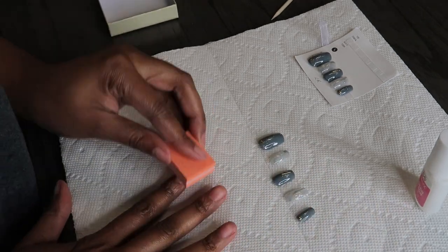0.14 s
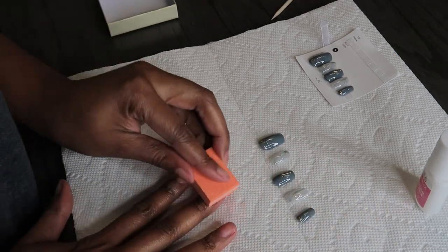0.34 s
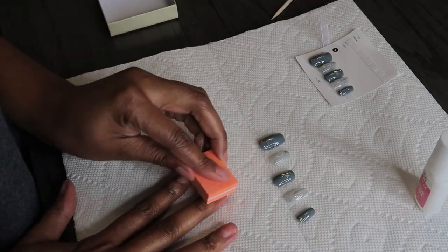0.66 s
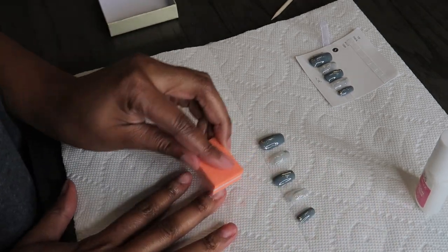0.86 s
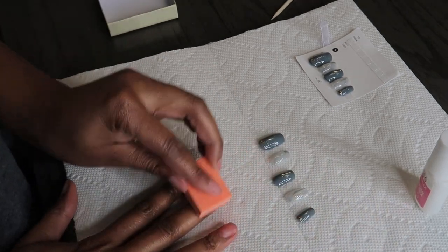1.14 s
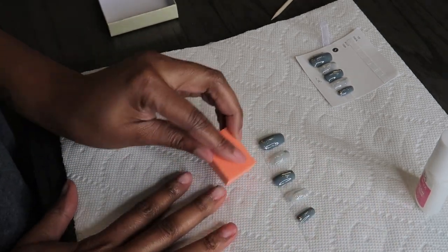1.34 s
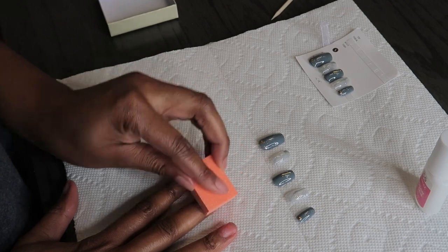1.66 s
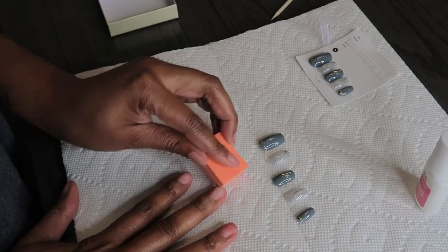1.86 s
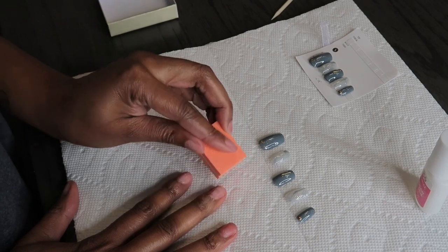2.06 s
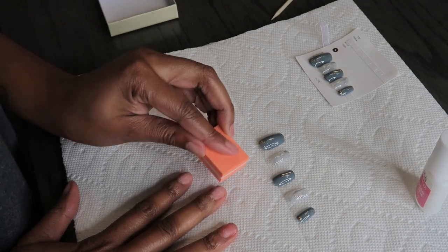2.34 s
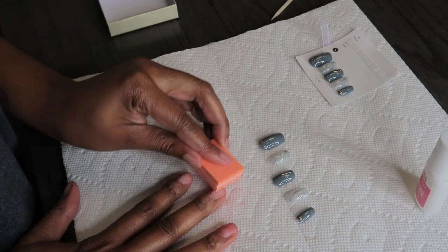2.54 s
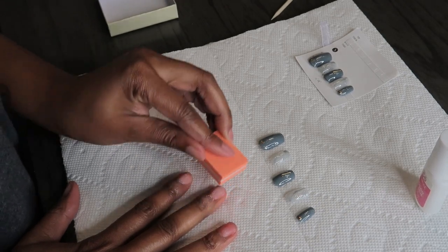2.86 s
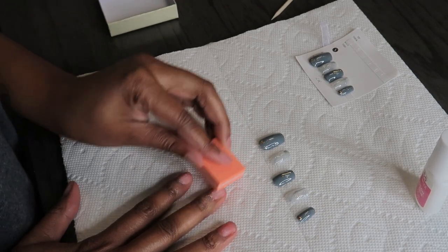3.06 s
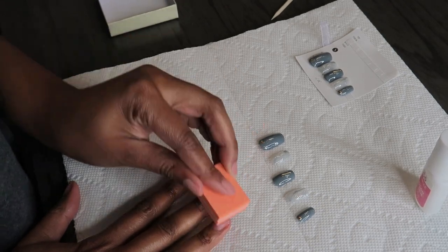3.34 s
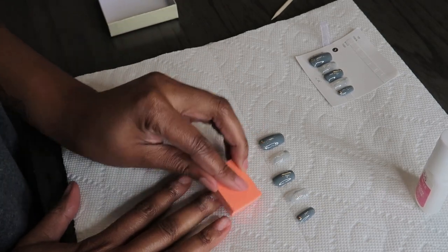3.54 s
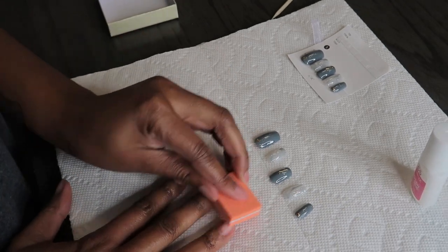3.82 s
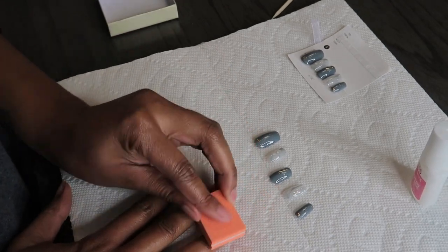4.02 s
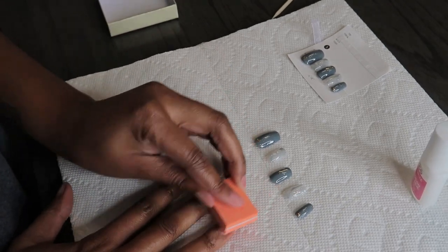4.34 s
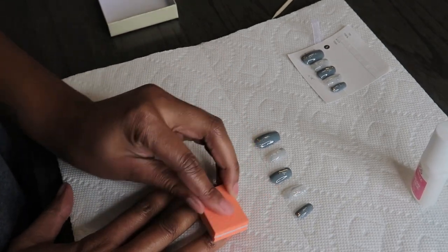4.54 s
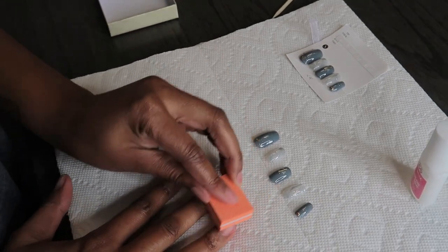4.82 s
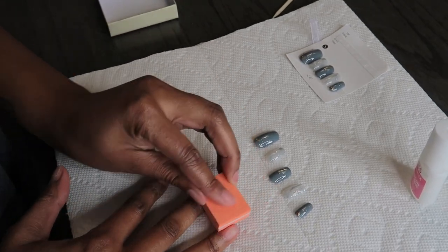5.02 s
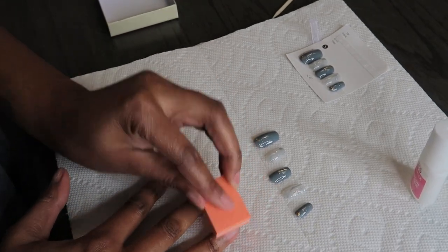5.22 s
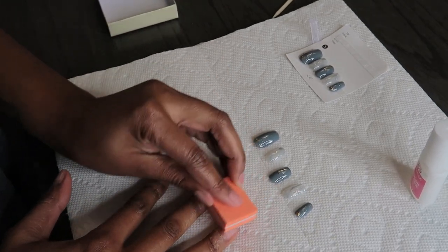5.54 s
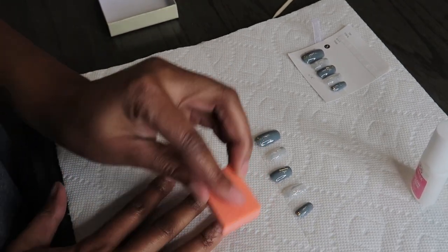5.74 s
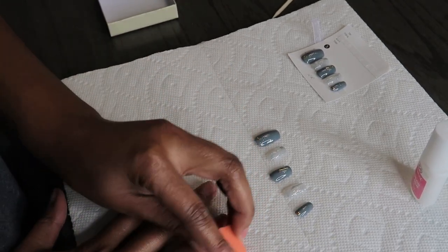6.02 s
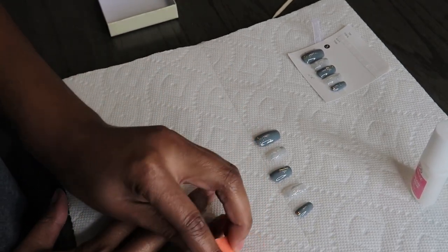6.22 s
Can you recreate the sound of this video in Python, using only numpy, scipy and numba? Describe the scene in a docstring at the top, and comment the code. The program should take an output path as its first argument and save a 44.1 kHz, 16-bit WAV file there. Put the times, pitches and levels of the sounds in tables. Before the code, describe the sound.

Close to a camera microphone at a table in a small room, a sanding block rubs fingernails in short, bright, gritty scratches, usually in quick runs of about four a second. Light taps and tiny crunches mark its landings, with occasional sharper scratches. A low, wavering ventilation hum continues throughout, with faint motor ticks during the first second.

```python
"""At a table in a small ventilated room, a foam sanding block buffs fingernails close to a camera.
Strokes, about four a second, are enveloped grit noise, crackling with snags, through nail resonances.
Landings add a snap and a crunch; coarse grains add short scratches. Room noise tails answer.
Ventilation is coloured noise plus tones; for about the first second a lens motor ticks as it refocuses."""
import sys
import numpy as np
from scipy import signal
from scipy.fft import rfft, irfft, next_fast_len
from scipy.io import wavfile
from scipy.ndimage import map_coordinates
from numba import njit

SR = 44100
rng = np.random.default_rng(int(sys.argv[2]) if len(sys.argv) > 2 else 0)


def put_to_file(sound):
    """Save the sound as 16-bit audio at rate SR, in the file named by the first command-line argument."""
    columns = np.atleast_2d(sound).T  # one column per channel
    safe = np.clip(columns, -1, 1)
    whole_steps = np.round(safe * 32767)
    wavfile.write(sys.argv[1], SR, whole_steps.astype(np.int16))


N = 281534
TIME_S = np.arange(N) / SR
FFT_SIZE = next_fast_len(N + SR)
FREQ_HZ = np.arange(FFT_SIZE // 2 + 1) * SR / FFT_SIZE

# ventilation noise density: (frequency [Hz], level [dB per Hz])
AIR_SPECTRUM = [(15, -78), (28, -76), (60, -68), (150, -69), (200, -69), (300, -77), (420, -79),
                (620, -80.5), (1000, -87), (2000, -93.5), (4000, -101), (8000, -108.5), (12000, -111),
                (15000, -120)]
# duct and room modes: (centre [Hz], width at half power [Hz], peak density [dB per Hz])
DUCT_MODES = [(35, 8.1, -64.5), (74.9, 11.1, -55), (85.9, 4, -55), (107, 10.9, -48), (122.7, 5.3, -49.5),
              (131.85, 9.6, -50), (150, 34, -64.5), (177.6, 5.1, -63), (231, 27.8, -65), (268, 10.2, -66.5),
              (309.3, 25.5, -65), (342, 6.6, -72), (386.7, 35.5, -71.5), (449.4, 22, -76.5)]
# mains, motor and electronics tones: (frequency [Hz], mean RMS level [dB])
HUM_TONES = [(120, -46), (218, -60), (259.3, -56.5), (778, -71.5), (908, -71.5), (11449, -87)]
# likeness of the ventilation noise at the two ports: (frequency [Hz], correlation [0-1])
PORT_LIKENESS = [(80, .9998), (130, 1), (230, 0.97), (420, 0.74), (900, 0.65), (1300, 0.18), (4000, 0.5),
                 (12000, 0)]
# strength of the air flow: (time [s], gain [dB])
AIR_FLOW = [(0, 0.5), (.9, 0.5), (1.8, -0.5), (3.1, 0.5), (4.1, -1), (5.2, -1), (6.3, -2)]
# lens motor steps: (time [s], relative level [dB])
FOCUS_STEPS = [(.184, -40.5), (.199, -48), (.215, -44.5), (.232, -49), (.248, -51), (.266, -53),
               (.282, -53), (.298, -48), (.315, -45.5), (.341, -47), (.365, -48), (.382, -53), (.399, -53),
               (.417, -53), (.433, -49), (.474, -48), (.498, -46), (.616, -45), (.634, -44), (.648, -46.5),
               (.682, -46), (.699, -50), (.965, -50), (.982, -50), (.999, -53), (1.011, -51), (1.024, -45)]
# lens barrel resonances: (centre [Hz], width [Hz], relative gain [dB])
BARREL_MODES = [(3270, 300, -4), (3930, 350, -9), (4440, 320, -1), (5100, 300, -6)]
# lead of the left microphone port over the right: (frequency [Hz], phase [rad])
PORT_LEAD = [(100, 0), (4300, 0), (5200, .8), (6100, 1.7), (7200, 2), (8200, 2.7), (9200, 1.7),
             (10800, 2.7), (12500, 2.9), (15000, 2.6)]
# room sound against direct sound: (frequency [Hz], ratio [dB])
WET_RATIO = [(500, -14), (1500, -9), (3200, -8.5), (4500, -1.5), (6400, -4), (7700, -4.5), (8700, -1.5),
             (10500, -21), (13000, -50)]
# colour of grit on nail: (frequency [Hz], relative gain [dB])
SCRAPE_COLOUR = [(300, -20), (600, -4.5), (900, -7), (1400, -4.5), (2400, -3.5), (4200, -6.5), (5500, -2),
                 (6400, -3.5), (7300, -5), (8400, -6.5), (9800, -9), (11400, -7.5), (13000, -13),
                 (15000, -25)]
# block, hand and table top resonances: (centre [Hz], width at half the dB [Hz], relative gain [dB])
BODY_MODES = [(1350, 74, 8), (1620, 190, 3.5), (1823, 46, 9), (2016, 330, -3.5), (2080, 50, 8.5),
              (2288, 120, -9.5), (2310, 32, 15), (2458, 30, 8), (2600, 23, 6), (3510, 78, 4.5),
              (3900, 240, 3.5), (4600, 370, 1), (5150, 520, 3), (5430, 300, -3), (6320, 1230, 4),
              (8600, 600, 0.5), (9550, 1400, 2.5)]
# block landings: (time [s], relative level [dB], relative snap against crunch [dB], crunch decay [s],
#                  contact ring [Hz], dull knock [dB])
LANDINGS = [(.499, -52.5, -4, 0.014, 6300, 8), (1.266, -51, -6, .004, 6300, 9),
            (1.525, -53, -4, .0036, 6300, 6), (2.298, -53, -4, .004, 6300, 7),
            (2.552, -55, -4, .003, 6300, 4), (2.836, -53, 0, .004, 6300, -2),
            (3.087, -49, -7, .002, 3500, 11), (3.523, -44.5, -8, 0.0095, 6300, 2.5),
            (3.8318, -48, -1, .002, 6300, 7), (4.134, -44.5, -6, 0.0015, 3480, 7),
            (4.383, -55, -3, .003, 6300, 3), (4.627, -44.5, -2, .0043, 6300, 3),
            (4.88, -40, -0.5, .001, 1200, 7), (4.888, -52, 5, .0014, 6300, 4),
            (5.094, -44.5, -7, 0.0084, 6300, 7), (5.1474, -51, 14.5, .00093, 3400, -2),
            (5.3581, -41.5, 1, .0018, 1300, 7), (5.604, -50.5, -3, 0.0064, 1500, 9.5),
            (6.072, -54, 5, .0027, 3500, 9), (6.3228, -50, 3, .0026, 3500, 6)]
# coarse grains catching on the nail's edge: (time [s], relative level [dB], decay [s])
GRAIN_SCRATCHES = [(0.847, -43, 0.0037), (1.5638, -44, .004), (1.891, -40, 0.013), (3.603, -38, .003),
                   (3.877, -44, .006), (3.961, -35, .0012), (4.659, -46, .003), (4.907, -45, 0.0059),
                   (4.93, -46, .004), (5.645, -50, .004), (6.143, -35.5, .005)]
# block strokes: (start [s], length [s], relative level [dB], skew [under 1 peaks early],
#                 mean dull rasp against hiss [dB], mean contact ring [Hz], mean nail bending pitch [Hz],
#                 bending strength [dB], finest sizzle gain [dB])
STROKE_TABLE = [(0.154, 0.078, -54.5, .75, -8, 8500, 2100, -6, 2),
                (0.523, 0.075, -38, 0.87, -1.5, 6860, 2000, -6, -3),
                (.716, 0.038, -45.5, 0.92, 1, 6700, 2100, -12, 0),
                (0.774, 0.13, -39, .92, -.5, 6800, 2330, -4, -10),
                (1.044, 0.096, -39, 0.79, -5, 7300, 2260, 0, -10),
                (1.182, 0.027, -58, .91, 5, 6300, 2100, -3, 5),
                (1.295, 0.12, -41, 0.78, -2, 6740, 2700, -2, 1),
                (1.558, 0.11, -41, 0.83, -4, 6900, 2500, -8, 0),
                (1.812, 0.13, -37.5, 0.68, -4, 7050, 3870, -10, -4),
                (2.331, 0.076, -40.5, .76, -4, 6860, 2180, -3, -7),
                (2.587, .105, -41.5, 0.76, -5.5, 6600, 1890, 3, -5),
                (2.865, 0.082, -43, 0.9, -1.5, 6400, 1900, -3, -6),
                (3.12, 0.072, -41, 0.87, -0.5, 6900, 1700, -11, -2),
                (3.58, 0.099, -38.5, 0.92, -2, 7350, 2040, -4, -1),
                (3.872, 0.11, -39, 1.25, 1, 6700, 1640, -6, -3),
                (4.168, 0.1, -40.5, 0.78, 1, 6240, 1690, -20, -7),
                (4.414, 0.098, -40, .72, 0.5, 6300, 2000, -14, -8),
                (4.665, 0.078, -41, 0.45, -1, 5770, 2190, -19, -7),
                (4.912, 0.076, -39.5, 0.5, 0, 6200, 4200, -5, -2),
                (5.165, 0.038, -43.5, 0.54, 0, 6200, 4200, 4, 4),
                (5.397, 0.067, -41, 0.54, -3, 6040, 1300, -19, -9),
                (5.638, 0.061, -41.5, 0.78, -1, 5930, 2400, -13, -1),
                (5.809, 0.028, -63, .7, 9, 6300, 2400, -9, 0),
                (6.109, 0.099, -40.5, 0.86, 2.5, 6540, 1870, -8, -5),
                (6.355, 0.056, -38.5, 1.1, 3, 7200, 3260, 1.5, 8)]


def undb(db):
    """Decibels to gain."""
    return 10 ** (np.asarray(db) / 20)


def curve(points):
    """Join (Hz, value) points on a log-frequency axis."""
    hz, value = np.transpose(points)
    return np.interp(np.log(FREQ_HZ + 1), np.log(hz), value)


def bell(centre_hz, width_hz):
    """Resonance shape: 1 at the centre, 0.5 at the edges of its width."""
    return .5 ** ((2 * (FREQ_HZ - centre_hz) / width_hz) ** 2)


def colour(x, gain):
    """Filter by a gain for each frequency."""
    return irfft(rfft(x, FFT_SIZE) * gain, FFT_SIZE)[..., :N]


def causal(db):
    """Unit-power minimum-phase response: it rings only after its cause."""
    cepstrum = irfft(np.log(undb(db)), FFT_SIZE)
    response = np.exp(rfft(2 * cepstrum[:FFT_SIZE // 2], FFT_SIZE))
    return response / np.sqrt(np.mean(abs(response) ** 2))


def walk(rate_hz):
    """Smooth random drift of unit spread."""
    drift = colour(rng.standard_normal(N), bell(0, 2 * rate_hz))
    return drift / drift.std()


def add(track, start_s, sound):
    """Mix a short sound into a track at its time."""
    first = int(start_s * SR)
    part = track[first:first + len(sound)]
    part += sound[:len(part)]


def above(x, hz):
    """The part of a sound above a frequency."""
    return signal.sosfiltfilt(signal.butter(3, hz, "high", fs=SR, output="sos"), x)


@njit
def resonator(x, hz, width_hz):
    """State-variable band-pass, unity at a centre that may move at every sample."""
    y, band, low = np.empty(len(x)), 0., 0.
    for i in range(len(x)):
        g, damping = np.tan(np.pi * hz[i] / SR), width_hz / hz[i]
        v = (band + g * (x[i] - low)) / (1 + g * (g + damping))
        band, low = 2 * v - band, low + 2 * g * v
        y[i] = damping * v
    return y


def ventilation(waver_db=2.5, waver_hz=2.0, flutter_db=1.7, flutter_hz=12):
    """Air rumbles in duct and room modes, alike at both ports in the bass, with wavering tones."""
    power = undb(curve(AIR_SPECTRUM)) ** 2
    for hz, width_hz, db in DUCT_MODES:
        power = power + undb(db) ** 2 * bell(hz, width_hz)
    alike = np.clip(curve(PORT_LIKENESS), -1, 1)
    density_gain = power * SR / 2
    mid = colour(rng.standard_normal(N), np.sqrt(density_gain * (1 + alike) / 2))
    side = colour(rng.standard_normal(N), np.sqrt(density_gain * (1 - alike) / 2))
    # flow strength scales only the low rumble
    flow_gain = undb(np.interp(TIME_S, *np.transpose(AIR_FLOW)))
    mid = mid + colour(mid, bell(0, 540)) * (flow_gain - 1)
    # eddies make the rush of air waver
    mid = mid + colour(mid, bell(1110, 1330)) * (undb(flutter_db * walk(flutter_hz)) - 1)
    tones = np.zeros(N)
    for hz, db in HUM_TONES:
        amplitude = np.sqrt(2) * undb(db + waver_db * walk(waver_hz))
        tones += amplitude * np.sin(2 * np.pi * (hz * TIME_S + rng.random()))
    return mid + side * np.array([[1], [-1]]) + tones


def lens_motor(tick_decay_s=0.0032, gain_db=-2.5):
    """The focus motor hunts in small uneven steps; each noise tick rings the barrel briefly."""
    force = np.zeros(N)
    tick = np.exp(-TIME_S[:SR // 50] / tick_decay_s)
    for start_s, db in FOCUS_STEPS:
        add(force, start_s, undb(db + gain_db) * tick)
    modes = sum(undb(db) / (1 + 2j * (FREQ_HZ - hz) / width_hz) for hz, width_hz, db in BARREL_MODES)
    barrel = bell(4100, 3200) * modes
    barrel = barrel / np.sqrt(np.mean(abs(barrel) ** 2))
    return colour(force * rng.standard_normal((2, N)), barrel)


def room(x, t60_s=0.62, treble_t60_s=0.28, early_s=0.0074, early_db=5):
    """Direct sound reaches the ports out of step; table and walls add a short diffuse tail."""
    age_s = TIME_S[:SR // 2]
    noise = rng.standard_normal((2, len(age_s)))
    dull = signal.sosfilt(signal.butter(2, 4000, fs=SR, output="sos"), noise)
    tail = dull * 1e-3 ** (age_s / t60_s) + (noise - dull) * 1e-3 ** (age_s / treble_t60_s)
    # denser early reflections, none within the first millisecond
    tail = tail * (1 + undb(early_db) * np.exp(-age_s / early_s)) * (age_s > .001)
    tail = tail / np.sqrt(np.sum(tail ** 2, axis=1, keepdims=True))
    wet = undb(curve(WET_RATIO))
    direct = np.exp(.5j * np.array([[1], [-1]]) * curve(PORT_LEAD))
    response = (direct + wet * rfft(tail, FFT_SIZE)) / np.sqrt(1 + wet ** 2)
    return colour(x, response)


def grit(size, spread_db):
    """Dense tiny catches of abrasive grains, a few of them much larger."""
    largeness = np.minimum(rng.exponential(size=size), 5)
    catches = rng.standard_normal(size) * undb(spread_db * largeness)
    return catches / catches.std()


def contact(push, ring_hz, rasp_db, ring_width_hz=1300, ring_db=-4, rasp_hz=3300):
    """The nail rings at a pitch set by where it is pressed; a flatter, firmer contact adds low rasp."""
    ring = resonator(push, ring_hz * np.ones(len(push)), float(ring_width_hz))
    low = signal.sosfiltfilt(signal.butter(3, rasp_hz, fs=SR, output="sos"), push)
    return push + undb(ring_db) * ring + (undb(rasp_db) - 1) * low


def flex(push, bend_hz, db, width_hz=600):
    """The nail under the block bends at a low pitch of its own, set by where it is pressed."""
    return push + undb(db) * resonator(push, bend_hz * np.ones(len(push)), float(width_hz))


def touches(snap_db=9, settle_db=-18, settle_s=.06, snap_rasp_db=2, gain_db=-4):
    """The block's edge snaps against the nail, the grit crunches and then settles faintly."""
    track, age_s = np.zeros(N), TIME_S[:SR // 5]
    blow = signal.unit_impulse(len(age_s), len(age_s) // 400)  # 0.5 ms in
    for start_s, db, hard_db, crunch_s, ring_hz, knock_db in LANDINGS:
        press = np.exp(-age_s / crunch_s) + undb(settle_db) * np.exp(-age_s / settle_s)
        snap = contact(blow, ring_hz, knock_db + snap_rasp_db, ring_db=12) * undb(snap_db + hard_db)
        crunch = contact(grit(len(age_s), 0.8) * press, ring_hz, knock_db, ring_db=-17)
        add(track, start_s - .0005, undb(db + gain_db) * (snap + crunch))
    return track


def scratches(ring_hz=4000, rasp_db=7, spread_db=3, gain_db=-5):
    """A coarse grain digs in and tears free: a burst of ragged catches, duller than the hiss."""
    track, age_s = np.zeros(N), TIME_S[:SR // 20]
    for start_s, db, decay_s in GRAIN_SCRATCHES:
        burst = grit(len(age_s), spread_db) * np.exp(-age_s / decay_s)
        add(track, start_s, undb(db + gain_db) * contact(burst, ring_hz, rasp_db, ring_db=-2))
    return track


def strokes(judder_db=0.2, judder_hz=150, fullness=.86, spread_db=2.0, rasp_fall_db=6.5,
            hiss_rise_db=8, hiss_start_db=-2, hiss_hz=8000, sizzle_hz=11000, hand_db=-15, gain_db=-2.5,
            ring_wander=0.026, rasp_wander_db=0.5, rock_hz=45, snags_per_s=160, snag_db=11,
            grab_s=0.0013, bite_db=-17, bite_s=.014, bend_glide=0.085, hand_glide=0.19,
            brush_db=-27, brush_s=0.038, brush_wander_db=4):
    """Each stroke bites with a dull rasp, speeds up and slows down; the block judders and rocks."""
    track, age_s = np.zeros(N), TIME_S[:SR // 5]
    size = len(age_s)
    roll, tilt = walk(rock_hz), walk(rock_hz)
    for start_s, length_s, db, skew, rasp_db, ring_hz, bend_hz, bend_db, sizzle_db in STROKE_TABLE:
        travel = np.clip(age_s / length_s, 0, 1)
        speed = abs(np.sin(np.pi * travel ** skew))
        roll_now = np.interp(start_s + age_s, TIME_S, roll)
        tilt_now = np.interp(start_s + age_s, TIME_S, tilt)
        # coarse grains snag and crackle out of the fine grit
        snagged = rng.random(size) < snags_per_s / SR
        snags = snagged * rng.choice([-1, 1], size) * undb(snag_db)
        # the foam gives for a moment, then the grit grabs all at once
        grab = 1 - np.exp(-(age_s / grab_s) ** 4)
        bite = undb(bite_db) * np.exp(-age_s / bite_s)
        # after the push the block still brushes the nail, loosely and unevenly
        brush_decay = np.exp(-np.maximum(age_s - length_s, 0) / brush_s)
        brush = travel * brush_decay * undb(brush_db + brush_wander_db * tilt_now)
        push = (grit(size, spread_db) + snags) * grab * (speed ** fullness + bite + brush)
        # as the block lifts away only the finest grit still touches: the hiss brightens
        push = push + (undb(hiss_start_db + hiss_rise_db * travel) - 1) * above(push, hiss_hz)
        push = push + (undb(sizzle_db) - 1) * above(push, sizzle_hz)
        # the point of pressure slides along the nail, so its bending pitch glides
        push = flex(push, bend_hz * np.exp(bend_glide * (.5 - travel)), bend_db)
        # rocking over the curved nail shifts the ring and makes the rasp come and go
        ring_now_hz = ring_hz * np.exp(ring_wander * roll_now)
        rasp_now_db = rasp_db + rasp_fall_db * (.5 - travel) + rasp_wander_db * tilt_now
        scrape = undb(db) * contact(push, ring_now_hz, rasp_now_db)
        # the moving hand reflects the scrape from a changing distance, shifting its colour
        lag_s = rng.uniform(0.000492, 0.00143) * np.exp(hand_glide * travel)
        reflection = map_coordinates(scrape, [(age_s - lag_s) * SR])
        add(track, start_s, scrape + undb(hand_db) * reflection)
    return track * undb(gain_db + judder_db * walk(judder_hz))


def scene(left_db=0.28):
    """Buffing a little left of centre, the lens motor and the ventilation."""
    modes_db = sum(db * bell(hz, width_hz) for hz, width_hz, db in BODY_MODES)
    body = causal(curve(SCRAPE_COLOUR) + modes_db)
    buffing = room(colour(strokes() + touches() + scratches(), body))
    buffing = buffing * undb(np.array([[left_db], [-left_db]]))
    return buffing + lens_motor() + ventilation()


def record(dry, top_hz=15300):
    """The camera cuts the top with a steep elliptic low-pass."""
    return signal.sosfilt(signal.ellip(8, .2, 70, top_hz, fs=SR, output="sos"), dry)


dry = scene()
out = record(dry)
put_to_file(out)
```